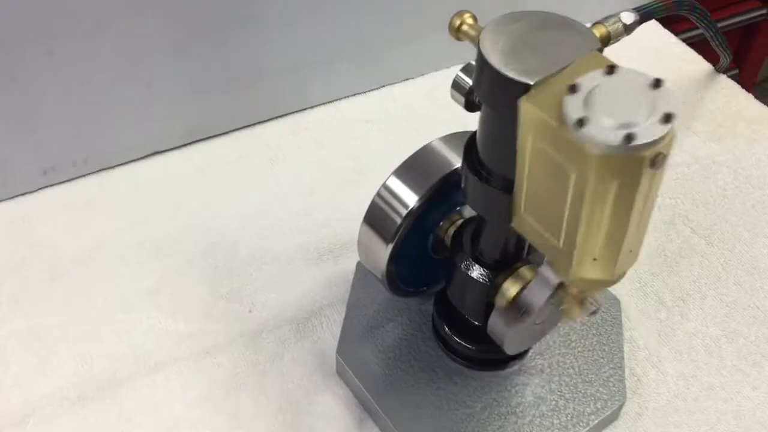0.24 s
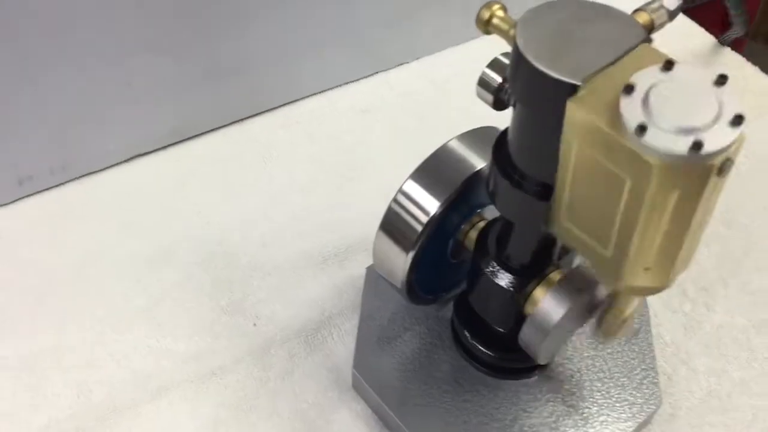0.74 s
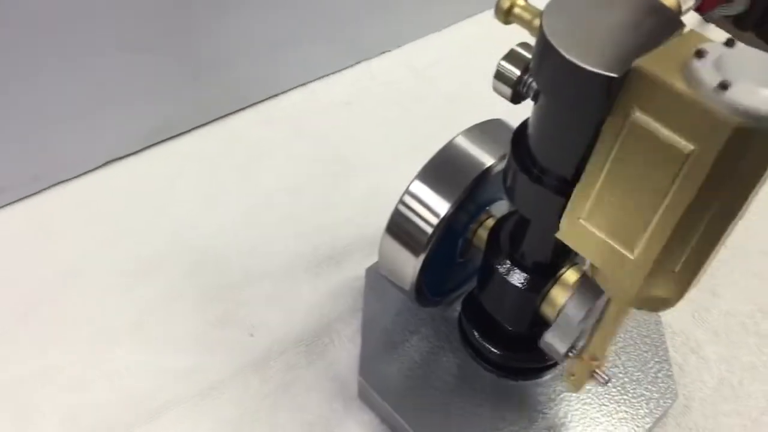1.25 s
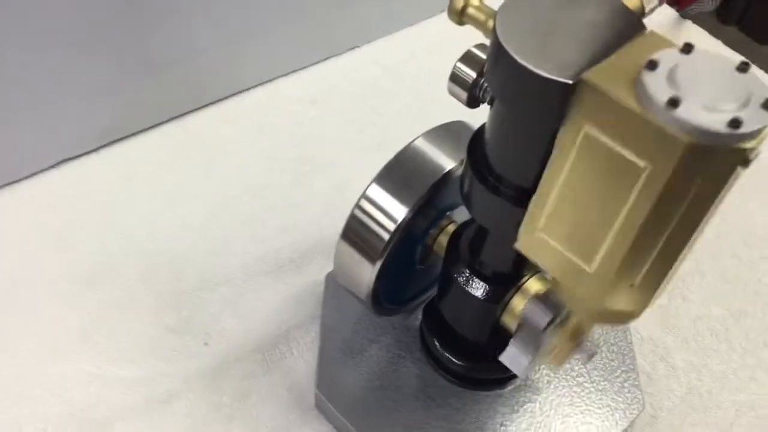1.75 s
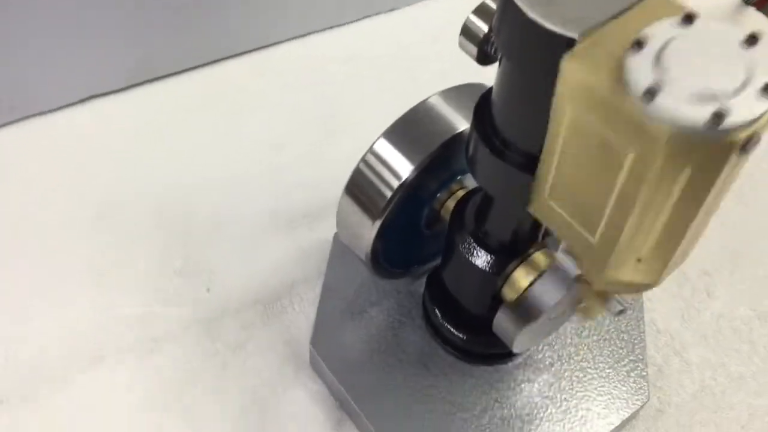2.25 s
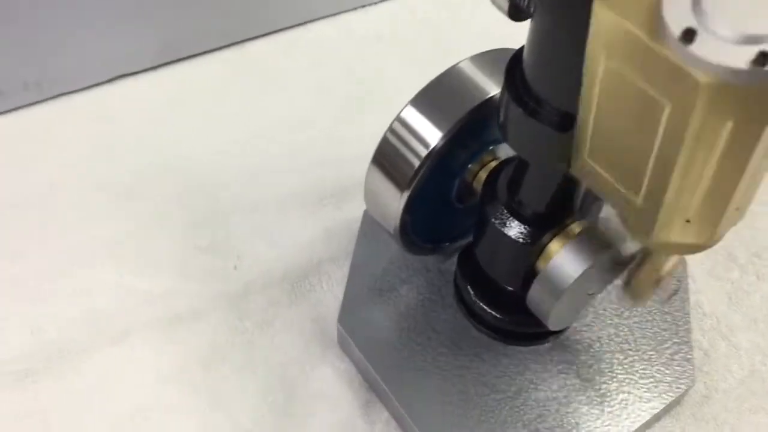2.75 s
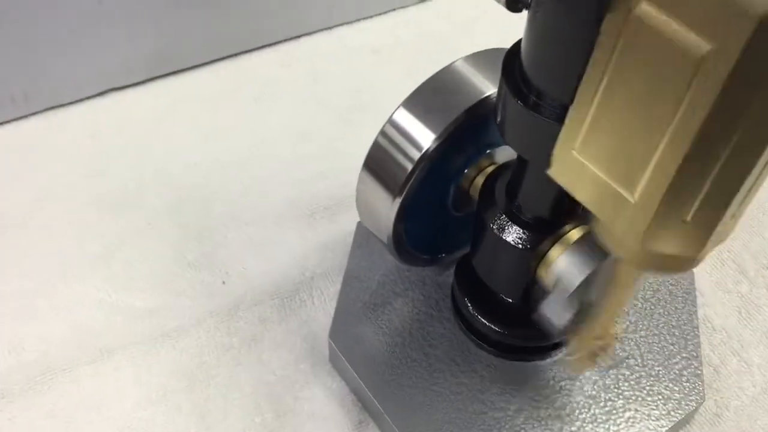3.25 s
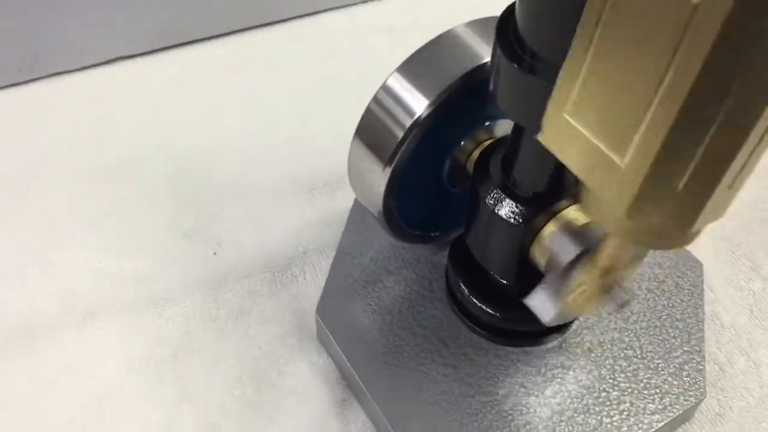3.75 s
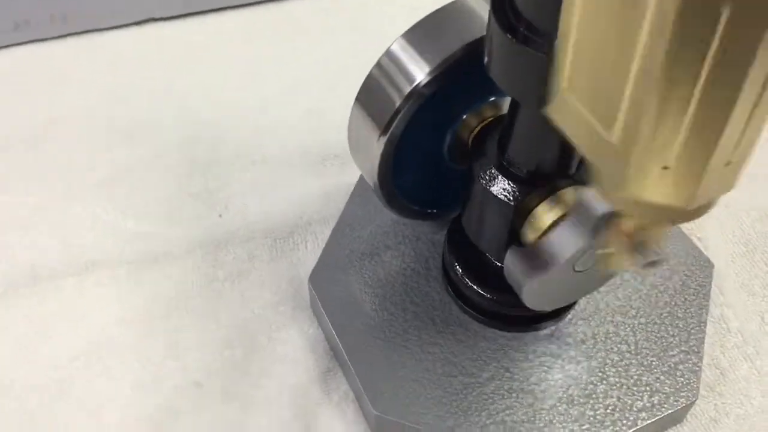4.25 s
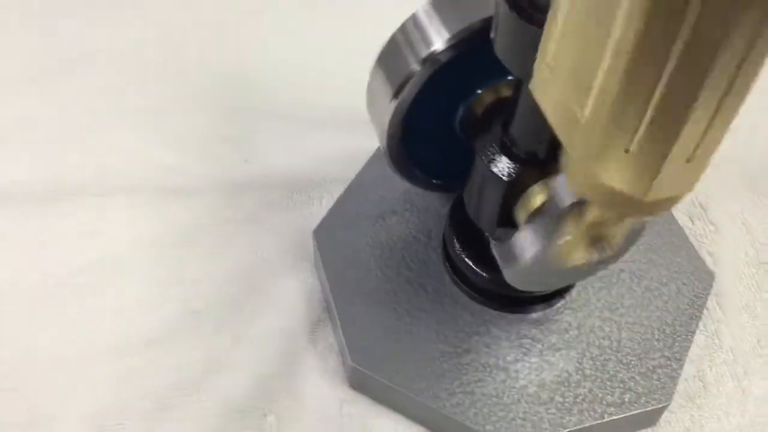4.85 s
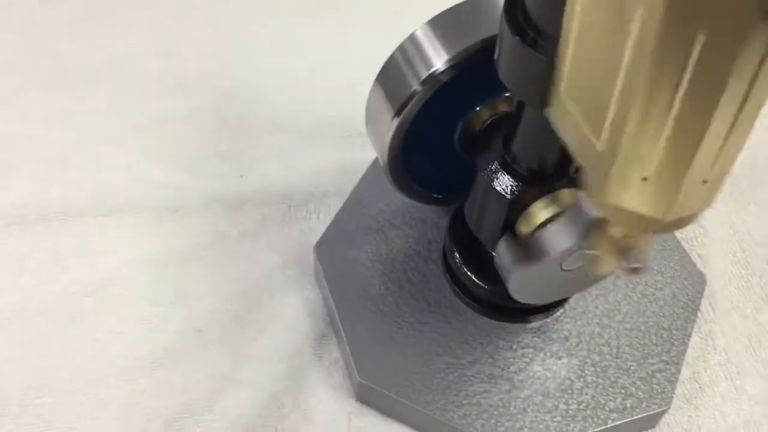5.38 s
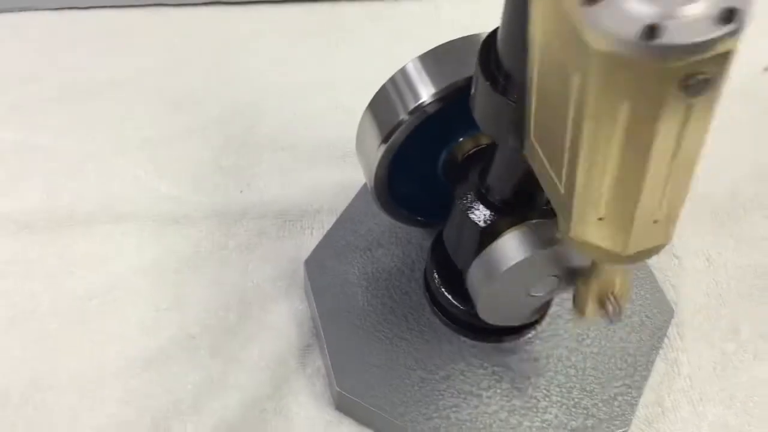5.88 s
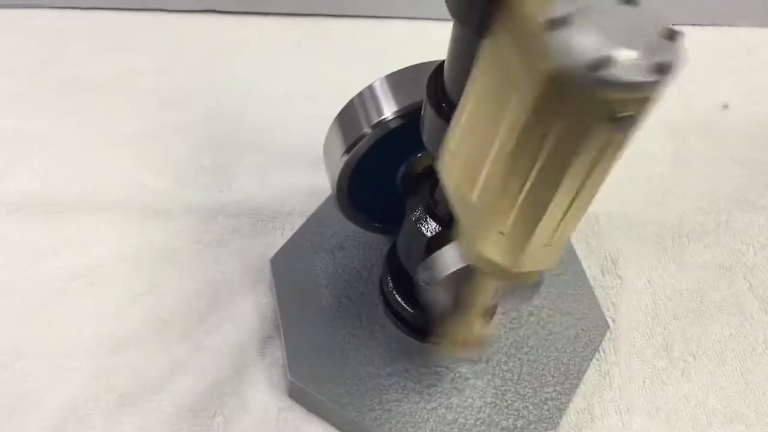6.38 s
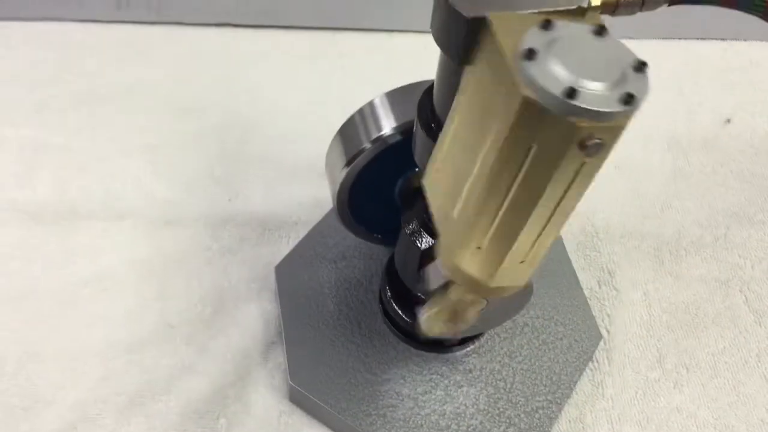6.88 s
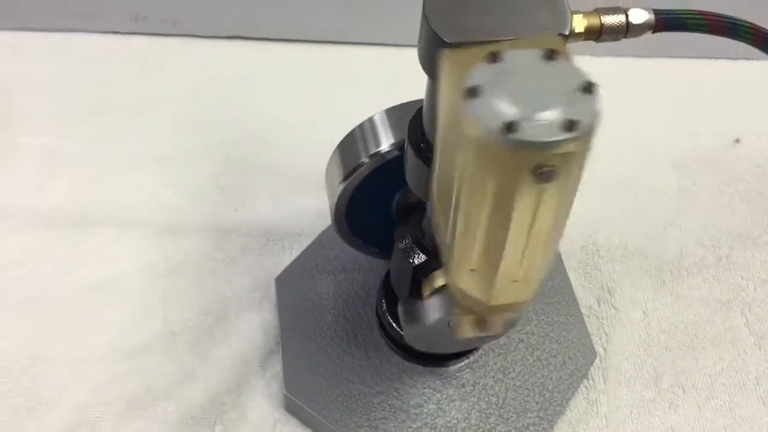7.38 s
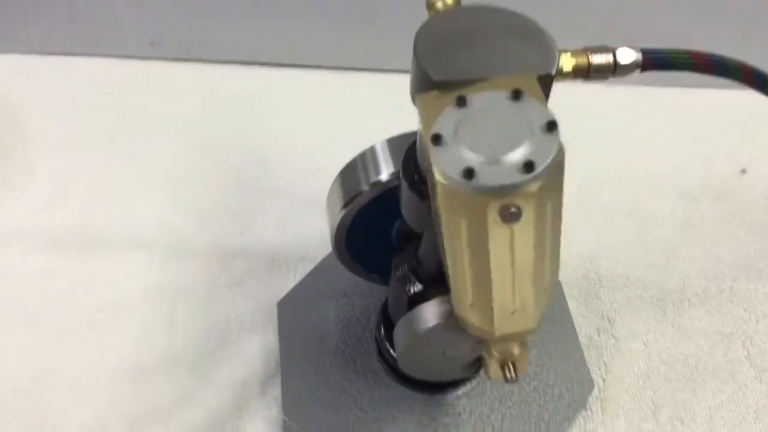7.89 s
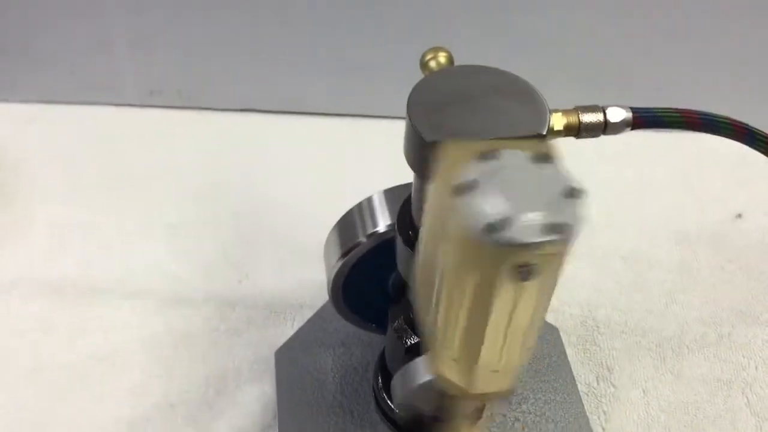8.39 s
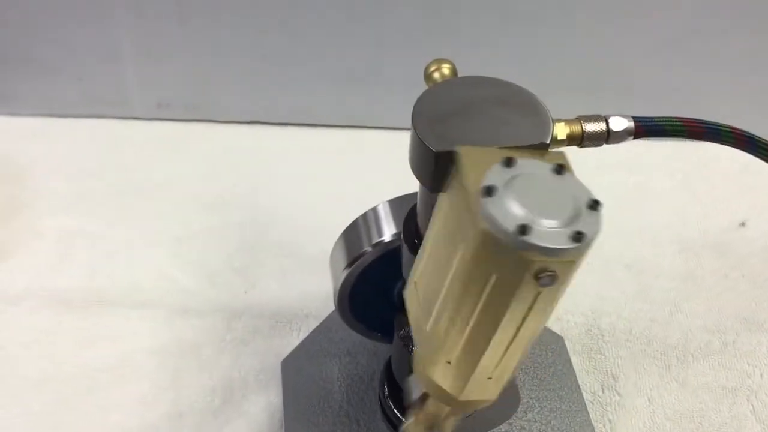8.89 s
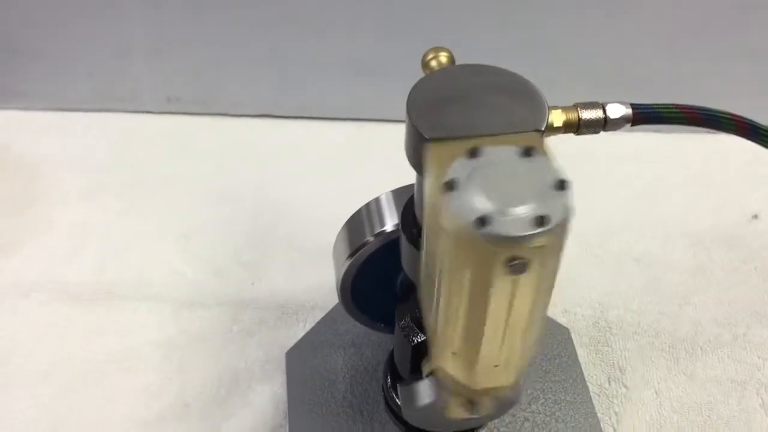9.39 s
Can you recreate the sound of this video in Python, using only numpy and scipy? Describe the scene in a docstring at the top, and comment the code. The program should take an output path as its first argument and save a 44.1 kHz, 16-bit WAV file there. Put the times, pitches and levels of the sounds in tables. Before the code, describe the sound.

A small air-driven engine runs steadily on a workshop table, giving about three and a half sharp, bright exhaust puffs a second. Each is followed by a short hiss and a tiny chuff, with light metal knocks just before the next puff. A hand-held close microphone moves nearer the crank midway, making the metal clearer, then draws back. Quiet room air and faint mains hum lie behind.

```python
"""The exhaust of a small oscillating-cylinder engine on compressed air, about 3.5 turns a second on a workshop table.
Each turn the port opens with a sharp puff of shaped noise, then the piston sweeps out the rest as a hiss.
Slack bearings knock as short impulses into ringing metal; the pivot squeaks faintly as a wavering tone.
The microphone is hand-held above the table and moves: nearer the crank the metal grows. Behind lie
short tone bursts from the table top, a few handling bumps and rustles, room air and mains hum."""
import sys
import numpy as np
from scipy import signal
from scipy.fft import rfft, irfft, next_fast_len
from scipy.io import wavfile
from scipy.ndimage import uniform_filter1d, map_coordinates

SR = 44100
rng = np.random.default_rng(int(sys.argv[2]) if len(sys.argv) > 2 else 0)


def materialize(psi):
    """Save the field psi as 16-bit PCM at rate SR to the path in sys.argv[1].

    A 1-D psi becomes a single channel; in a 2-D psi each row is a channel.
    """
    bounded = np.clip(np.atleast_2d(psi).T, -1, 1)
    quanta = np.round(bounded * 32767).astype(np.int16)
    wavfile.write(sys.argv[1], SR, quanta)


N = 424683
TIME = np.arange(N) / SR
TURN_S = 0.28452
FIRST_PUFF_S = 0.0243  # only the first puff is off the beat
TOP_HZ = 15700


def undb(db):
    """Decibels to gain."""
    return 10 ** (np.asarray(db) / 20)


def unit(x):
    """Scale to rms 1."""
    return x / np.sqrt(np.mean(x ** 2))


def bins():
    """Frequencies of the noise spectrum in Hz, at least 1."""
    size = next_fast_len(N, True)
    return np.maximum(np.arange(size // 2 + 1) * SR / size, 1)


def colour(points):
    """Gain at every bin from (Hz, dB) points, interpolated over log frequency."""
    hz, db = np.transpose(points)
    return undb(np.interp(np.log(bins()), np.log(hz), db))


def resonance(hz, width_hz):
    """Gain of one resonance at every bin, 1 at its centre."""
    f = bins()
    return 1 / np.hypot(1, (f - hz * hz / f) / width_hz)


def noise(gain):
    """Noise with the given gain at every bin."""
    white = rng.standard_normal(next_fast_len(N, True))
    return irfft(gain * rfft(white))[:N]


def walk(rate_hz):
    """Smooth random wander with rms 1, taking a new value rate_hz times a second."""
    size = max(int(SR / rate_hz), 2)
    steps = np.repeat(rng.standard_normal(N // size + 1), size)
    return unit(uniform_filter1d(steps, size)[:N])


# How the speed wanders: t/s, lag behind an even beat/ms
SPEED_LAG = [(0.3, 0.5), (3.1, 0.1), (4.0, -2.5), (4.8, 1.5), (5.1, -0.3), (6.8, -0.36), (7.1, -2.0),
             (9.4, 2.0)]


def openings():
    """The moments in seconds at which the exhaust port opens, once a turn."""
    beat = np.arange(0, N / SR, TURN_S)
    lag_ms = np.interp(beat, *np.transpose(SPEED_LAG))
    return np.maximum(beat + lag_ms / 1000, FIRST_PUFF_S)


def per_turn(curve):
    """Read the columns of a slow curve once a turn."""
    s, *columns = np.transpose(curve)
    return [np.interp(openings(), s, column) for column in columns]


def vary(levels_db, offset_db, scatter_db):
    """No two turns are alike: scatter their levels around a trend."""
    return levels_db + offset_db + scatter_db * rng.standard_normal(len(levels_db))


def each_turn(shape, levels_db):
    """Repeat a (s after the port opens, dB) envelope at every turn, each at its own level."""
    s, db = np.transpose(shape)
    out = np.zeros(N)
    for opens, level_db in zip(openings(), levels_db):
        a, b = np.searchsorted(TIME, opens + s[[0, -1]])
        out[a:b] += undb(level_db + np.interp(TIME[a:b] - opens, s, db))
    return out


def add_burst(out, at_s, hz, length_s, db):
    """Add a tone burst that swells and dies around a moment."""
    a, b = np.searchsorted(TIME, [at_s - 4 * length_s, at_s + 4 * length_s])
    t = TIME[a:b] - at_s
    out[a:b] += undb(db) * np.exp(-(t / length_s) ** 2) * np.cos(2 * np.pi * hz * t)


# Spectrum of the workshop air: f/Hz, relative level/dB
ROOM_COLOUR = [(22, -16.5), (55, 5), (85, 1.5), (170, 3), (300, -2.5), (500, -9.5), (1200, -8.5),
               (1700, -10), (2250, -10.5), (2900, -13.5), (4400, -12.5), (5500, -15.5), (7000, -15.5),
               (10000, -23.5), (15700, -24.5)]
# Mains hum, each partial before its slow waver: f/Hz, rms level/dB
MAINS_HUM = [(120, -71), (240, -84.5), (360, -86)]


def workshop(air_db=-71.0, waver_db=0.46):
    """Steady room air as coloured noise, and a mains hum that wavers as the microphone moves."""
    hum = np.zeros(N)
    for hz, db in MAINS_HUM:
        phase = rng.uniform(0, 2 * np.pi)
        partial = np.sqrt(2) * np.sin(2 * np.pi * hz * TIME + phase)
        hum += undb(db + waver_db * walk(1.4)) * partial
    air = unit(noise(colour(ROOM_COLOUR)))
    return hum + undb(air_db + waver_db * walk(5.3)) * air


# Soft handling bumps: t/s, f/Hz, burst length/s, peak level/dB
HANDLING_BUMPS = [(5.028, 370, 0.0049, -52), (5.033, 227, 0.0092, -54.5), (5.645, 199, 0.0099, -54.5)]
# Soft rustles: t/s, half length/s, level/dB, approximate upper edge f/Hz
RUSTLES = [(3.45, .004, -53, 14240), (4.73, .08, -62.5, 2400), (4.958, .012, -66, 2400),
           (5.029, 0.0069, -64.5, 6500), (5.057, 0.03, -65.5, 12000)]


def handling(grain_db=4):
    """Close to the microphone: bumps as low tone bursts, rustles as swells of grainy noise."""
    out = np.zeros(N)
    for at_s, hz, length_s, db in HANDLING_BUMPS:
        add_burst(out, at_s, hz, length_s, db)
    for at_s, half_s, db, edge_hz in RUSTLES:
        rub = noise(resonance(edge_hz / 3, edge_hz) ** 2)
        rub = unit(rub * undb(grain_db * walk(120)))
        swell = np.exp(-np.minimum(((TIME - at_s) / half_s) ** 2, 50))
        out += undb(db) * rub * swell
    return out


# The table answers each change of force: t/s after the port opens, f/Hz, burst length/s,
# level/dB before each turn's rattle and scatter
THUMPS = [(-.093, 265, 0.0039, -77), (-.06, 195, .008, -58.5), (.002, 186, 0.0027, -55.5),
          (.013, 189.5, 0.0032, -55.5), (0.016, 100, .014, -64), (.028, 50.1, .018, -65)]


def table(rattle_db, scatter_db=2.2, coupling=0.71):
    """The rocking engine thumps the table top, harder on the turns that rattle."""
    out = np.zeros(N)
    for opens, rock_db in zip(openings(), rattle_db):
        for lag_s, hz, length_s, db in THUMPS:
            thump_db = db + coupling * rock_db + scatter_db * rng.standard_normal()
            add_burst(out, opens + lag_s, hz, length_s, thump_db)
    return out


def squeak(squeak_db, hz=3605, level_db=-72, leak_db=-70, waver_db=3):
    """On the power stroke the pivot sings thinly and a little air leaks past the port face."""
    # t/s after the port opens, relative level/dB
    sing_shape = [(-.105, -22), (-.088, -7.5), (-.074, -14), (-.066, 5),
                  (-.055, -0.5), (-.03, -5), (-.005, 3), (.004, -17.5)]
    leak_shape = [(-.095, -7), (-.065, -8), (-.035, -6.5), (-.015, 0), (0, -4)]
    wavering_hz = hz * (1 + .002 * walk(120))
    tone = np.sqrt(2) * np.sin(2 * np.pi * np.cumsum(wavering_hz) / SR)
    sing = tone * each_turn(sing_shape, squeak_db)
    leak = unit(noise(resonance(6500, 7000))) * each_turn(leak_shape, np.zeros_like(squeak_db))
    return undb(level_db + waver_db * walk(25)) * sing + undb(leak_db) * leak


# The bearing rubs as the load on it changes: t/s after the port opens, relative level/dB
BEARING_RUB = [(-.11, -20), (-.085, -1), (-.073, 1), (-.062, 4), (-.045, -5.5), (-.032, -9), (-.02, 0.5),
               (0, 0)]


def bearing(rattle_db, level_db=-70, grain_db=3):
    """The loaded bearing rubs grittily through the power stroke."""
    grit = unit(noise(resonance(1750, 760) ** 2)) * undb(level_db + grain_db * walk(300))
    return grit * each_turn(BEARING_RUB, .5 * rattle_db)


# Slack taken up by the crank, then by the pivot, within each turn: t/s after the port opens,
# level/dB before each turn's level and scatter, share of grit in the energy/0-1
CRANK_KNOCKS = [(-.024, -62, 0.6), (-.0196, -54.5, 0.09), (-.0175, -57, 0.09), (-.011, -62.5, 0.8),
                (.055, -69, .3), (.125, -69.5, 0.3)]
PIVOT_RATTLE = [(-.085, -71, 0.65), (-.069, -63, .6), (-.0635, -64, 0.91), (.087, -67.5, 0.82)]
# Modes of crank and frame, then of cylinder and base plate: f/Hz, t60/s, relative level/dB
FRAME_MODES = [(701, 0.15, -17), (973, 0.025, 1), (1030, .04, -1.5), (1283, 0.047, 1), (1360, 0.024, -7),
               (2204, .05, 0.5), (4100, .02, -9)]
CYLINDER_MODES = [(715.4, .06, -1), (1280, 0.067, -1.5), (1610, .04, -3.5), (1870, .04, -2),
                  (2380, .03, -7)]


def knocks(contacts, modes, levels_db, scatter_db=1.5, jitter_s=.0004, grit_s=.002, soft_hz=3400):
    """Oiled contacts tap and graze a metal part, which rings briefly."""
    force, t = np.zeros(N + SR), TIME[:SR // 10]
    ring = np.zeros(len(t))
    for hz, t60, db in modes:
        ring += undb(db) * np.sin(2 * np.pi * hz * t) * np.exp(-np.log(1000) * t / t60)
    # so small a part radiates no bass, and the oil film takes off the treble
    band = signal.butter(3, [600, soft_hz], "band", fs=SR, output="sos")
    ring = signal.sosfilt(band, ring)
    ring /= np.sqrt(np.mean(ring[:SR // 200] ** 2))  # rms 1 over the first 5 ms
    for opens, level_db in zip(openings(), levels_db):
        at_s = opens + jitter_s * rng.standard_normal()
        for lag_s, db, grit_share in contacts:
            grit = rng.standard_normal(len(t)) * np.exp(-t / grit_s)
            push = np.sqrt(grit_share) * grit / np.linalg.norm(grit)
            push[0] += np.sqrt(1 - grit_share)  # the clean tap
            gain = undb(db + level_db + scatter_db * rng.standard_normal())
            start = int((at_s + lag_s) * SR)
            if start >= 0:
                force[start:start + len(t)] += gain * push
    return signal.fftconvolve(force[:N], ring)[:N]


def closing(closing_db, level_db=-56):
    """The narrowing port pinches off the last air with a short chuff."""
    pinch = resonance(4680, 450) ** 2
    pinch += .5 * resonance(1800, 600) ** 2 + 0.44 * resonance(1200, 500) ** 2
    # t/s after the port opens, relative level/dB
    shape = [(.078, -12.5), (.085, -3.5), (.091, -1.5), (.097, -14.5)]
    return undb(level_db) * unit(noise(pinch)) * each_turn(shape, closing_db)


# Air flow as the piston sweeps out: t/s after the port opens, relative level/dB
SWEEP_OUT = [(.008, -41.5), (.022, 3), (.052, -2.5), (.064, -4), (.079, -9), (.09, -6), (.097, -17.5),
             (.115, -37.5)]
# Turbulence of the hiss: f/Hz, relative level/dB
HISS_COLOUR = [(300, -29), (700, -20), (1200, -1.5), (1750, -4), (2100, 7.5), (3100, 1), (5600, -8.5),
               (8000, -1), (9300, 10), (10300, -1), (11200, 4), (13000, -0.5), (15700, -3)]
# Resonances of the exhaust passage, for hiss and puff: f/Hz, nominal width/Hz (the players broaden it),
# relative level in the puff/dB, relative level in the hiss/dB
PASSAGE = [(2467, 130, 2, 5), (4525, 484, 9.5, 5), (7163, 500, 6.5, 9.5), (7920, 300, 2, 0),
           (8650, 310, -1, -6), (13820, 370, 8, 10.5)]


def hiss(puff_db, whistle_db, level_db=-50, whistle_level_db=-47,
         flutter_db=1.4, ring_db=1, shift_db=2, follow=.5):
    """The piston sweeps the cylinder empty; at its fastest the port edge nearly whistles."""
    air = noise(colour(HISS_COLOUR))
    for hz, width_hz, _, db in PASSAGE:
        # the flow favours now one resonance of the passage, now another
        favour = undb(db + ring_db + shift_db * walk(25))
        air += favour * noise(resonance(hz, 2.1 * width_hz) ** 2)
    air *= each_turn(SWEEP_OUT, follow * puff_db) * undb(level_db + flutter_db * walk(400))
    # t/s after the port opens, relative level/dB
    edge_shape = [(.02, -18), (.04, -5), (.053, -1), (.062, -11), (.09, -19)]
    edge = unit(noise(resonance(11800, 600) ** 2)) * each_turn(edge_shape, whistle_db)
    return air + undb(whistle_level_db) * edge


def crackle(puff_db, level_db=-35, ragged_db=5):
    """At full flow the jet spits tiny bright shocks: treble noise with a very fast ragged level."""
    # t/s after the port opens, relative level/dB
    peak_flow = each_turn([(.002, -21), (.006, 1.5), (.01, 0), (.015, -20)], puff_db)
    shocks = noise(resonance(11000, 7000) ** 2) * undb(ragged_db * walk(5000))
    return undb(level_db) * peak_flow * unit(shocks)


def edge_tones(puff_db, level_db=-37, spread_db=3, length_s=0.0036, count=6):
    """In each puff the jet locks for a few milliseconds onto some stray high pitches."""
    out = np.zeros(N)
    for opens, db in zip(openings(), puff_db):
        for pitch, when, strength in rng.uniform(size=(count, 3)):
            hz = 6500 + (14500 - 6500) * pitch
            tone_db = level_db + db + spread_db * (2 * strength - 1)
            add_burst(out, opens + .005 + .009 * when, hz, length_s, tone_db)
    return out


# Air flow of the puff: t/s after the port opens, relative level/dB
BLOWDOWN = [(-.004, -42.5), (-.001, -18.5), (.0015, -4.5), (.007, 1), (.014, 0.5), (.019, -7.5),
            (.025, -20), (.036, -63)]
# Turbulence of the puff: f/Hz, relative level/dB
PUFF_COLOUR = [(250, -23), (450, -24), (700, -19), (1000, -8), (1400, -4), (1750, -6), (2250, -4.5),
               (2900, 2), (5200, 1), (8700, 2), (10300, -1.5), (11500, 3.5), (14500, 1), (15700, -3.5)]


def puff(puff_db, pop_db, low_db, high_db, level_db=-26.0, flutter_db=1.1,
         ring_swing=1.4, pop_level_db=-29):
    """The cylinder blows down: a ragged jet that rings the passage differently on every turn."""
    jet = noise(colour(PUFF_COLOUR)) * each_turn(BLOWDOWN, puff_db)
    for k, (hz, width_hz, db, _) in enumerate(PASSAGE):
        # the second and third resonances are the low and the high port ring
        ring_db = {1: low_db, 2: high_db}.get(k, 0)
        flow = each_turn(BLOWDOWN, puff_db + ring_swing * ring_db)
        jet += undb(db) * noise(resonance(hz, 2 * width_hz) ** 2) * flow
    # the peak of the flow pops the cavity behind the port: t/s after it opens, relative level/dB
    pop_shape = [(0, -15), (.005, -12), (.008, -2.5), (.012, -16), (.022, -22)]
    pop = unit(noise(resonance(1810, 600) ** 2)) * each_turn(pop_shape, puff_db + pop_db)
    return jet * undb(level_db + flutter_db * walk(900)) + undb(pop_level_db) * pop


# The moving microphone hears the table's reflection late: t/s, lag/ms
REFLECTION_LAG = [(0, 1.16), (1.3, 0.99), (2.3, 1.1), (3.2, 1.08), (4.3, 1.16), (5.3, 1.171), (7, 1.155),
                  (9.6, 1.14)]


def reflected(x, bounce=0.26):
    """The exhaust is heard directly and once more off the table, by a path of changing length."""
    lag_ms = np.interp(TIME, *np.transpose(REFLECTION_LAG))
    return x + bounce * map_coordinates(x, [np.arange(N) - lag_ms * SR / 1000], order=3)


def room(x, room_db=-18, t60=0.19, count=4):
    """The short dry tail of the workshop; its fine pattern shifts as the microphone moves."""
    t, out = TIME[:SR // 2], x
    position = np.linspace(0, count - 1, N)
    for place in range(count):
        tail = rng.standard_normal(len(t)) * np.exp(-np.log(1000) * t / t60) * (t > .005)
        tail /= np.linalg.norm(tail)
        near = np.sqrt(np.maximum(1 - np.abs(position - place), 0))  # equal-power crossfade
        out = out + undb(room_db) * near * signal.fftconvolve(x, tail)[:N]
    return out


# Strength of the exhaust jet: t/s, relative level/dB
JET = [(0.3, -0.5), (3.7, 1.5), (4.0, 0.1), (7.1, -1.0), (8.0, 0.5), (8.3, -0.4), (9.4, 0.5)]
# The microphone comes close to the crank and draws back: t/s, relative level/dB
NEARNESS = [(0.3, -1.1), (3.1, 0.5), (4.3, 2.5), (8.0, -1.3), (9.4, -1.3)]
# Whistle of the port edge: t/s, relative level/dB
WHISTLE = [(0.3, -1.7), (2.6, 1.1), (3.4, 7.7), (4.0, -3.1), (6.5, 2), (8.0, -3), (8.5, -0.5), (9.4, -1.4)]
# The two main resonances of the passage, before scaling: t/s, low ring level/dB, high ring level/dB
PORT_RING = [(0.3, 0, -2.1), (2.0, -4.5, -3), (3.1, 2, -4.2), (4.3, 4.5, 4.5), (5.4, 0.6, 2.4), (6.5, 1, 1),
             (9.4, -2.5, 2.5)]


def scene(squeak_follow=1.7, closing_follow=1.2, rattle_follow=1.5, knock_follow=1.5):
    """Puff and hiss follow the jet; the metal grows as the microphone nears the crank."""
    (jet,), (near,) = per_turn(JET), per_turn(NEARNESS)
    (whistle,), (low, high) = per_turn(WHISTLE), per_turn(PORT_RING)
    puff_db = vary(jet, offset_db=-0.61, scatter_db=0.31)
    pop_db = vary(np.zeros_like(jet), offset_db=-2.5, scatter_db=.9)
    low_db = vary(.7 * low, offset_db=-1.5, scatter_db=0.72)
    high_db = vary(.7 * high, offset_db=0.88, scatter_db=0.6)
    whistle_db = vary(whistle, offset_db=-1.0, scatter_db=.9)
    closing_db = vary(closing_follow * (jet + near), offset_db=-0.9, scatter_db=1.6)
    squeak_db = vary(squeak_follow * near, offset_db=.6, scatter_db=1.1)
    knock_db = vary(knock_follow * near, offset_db=-0.66, scatter_db=0.44)
    rattle_db = vary(rattle_follow * near, offset_db=-1.7, scatter_db=.8)

    background = workshop() + handling() + table(rattle_db)
    metal = bearing(rattle_db)
    metal += knocks(PIVOT_RATTLE, CYLINDER_MODES, rattle_db)
    metal += knocks(CRANK_KNOCKS, FRAME_MODES, knock_db)
    exhaust = closing(closing_db) + hiss(puff_db, whistle_db)
    exhaust += crackle(puff_db) + edge_tones(puff_db)
    exhaust += puff(puff_db, pop_db, low_db, high_db)
    mix = background + squeak(squeak_db) + room(reflected(exhaust) + metal)
    return mix[None]  # one channel


def record(dry):
    """The recorder cuts the highest treble with a steep low-pass."""
    return signal.sosfilt(signal.ellip(10, .2, 70, TOP_HZ, fs=SR, output="sos"), dry)


dry = scene()
out = record(dry)
materialize(out)
```